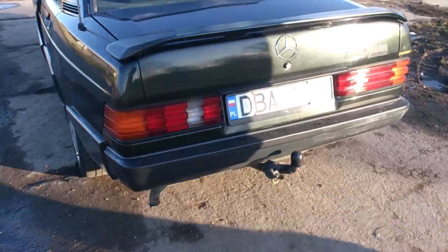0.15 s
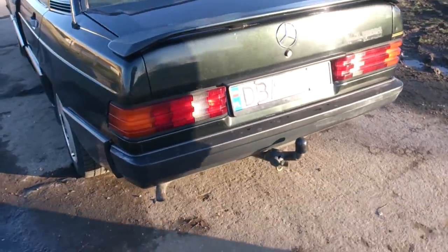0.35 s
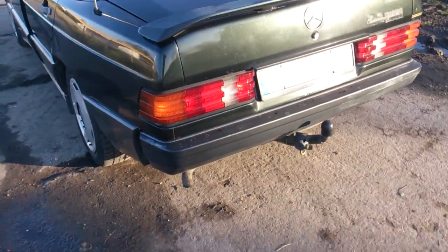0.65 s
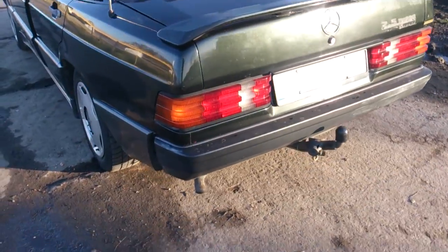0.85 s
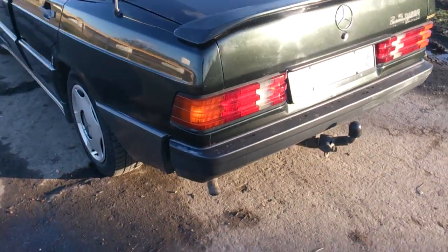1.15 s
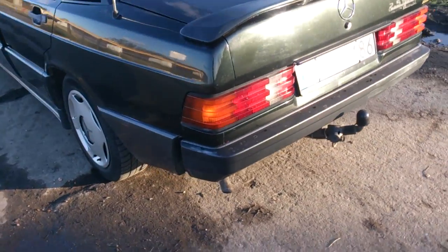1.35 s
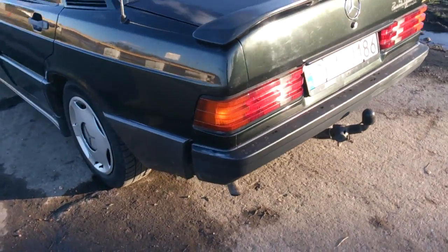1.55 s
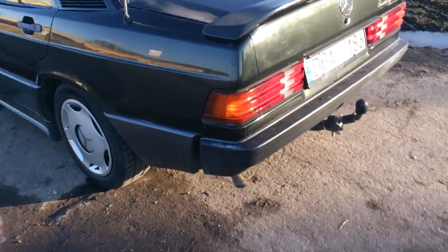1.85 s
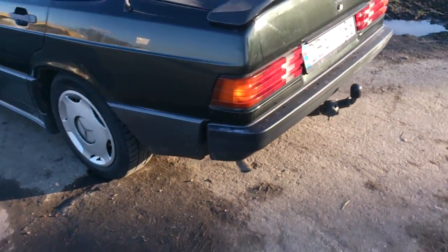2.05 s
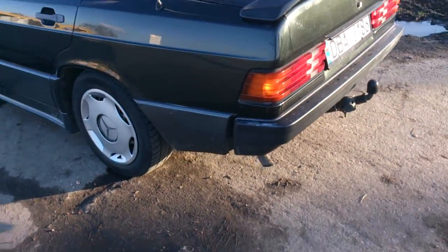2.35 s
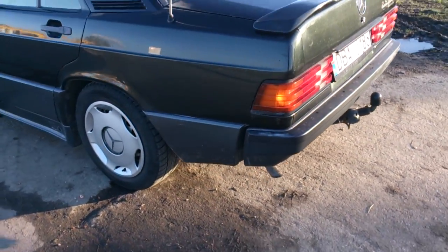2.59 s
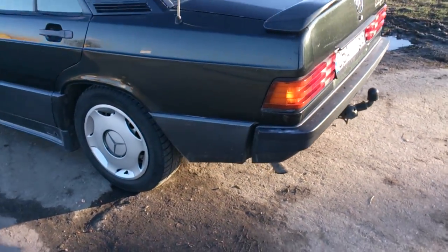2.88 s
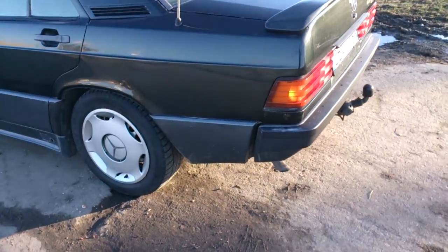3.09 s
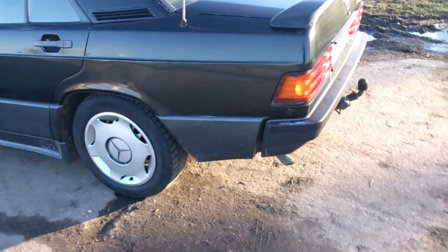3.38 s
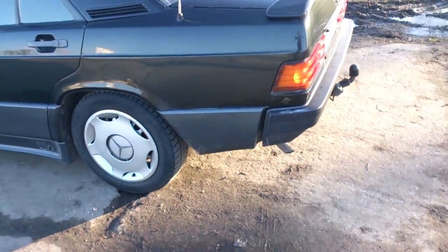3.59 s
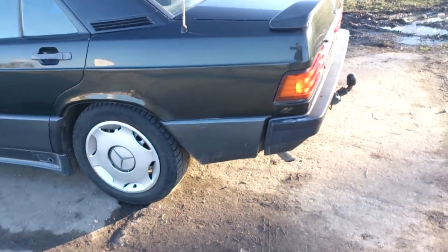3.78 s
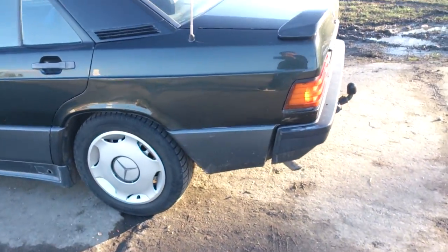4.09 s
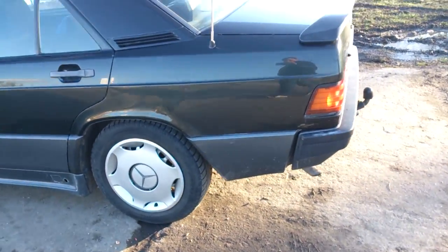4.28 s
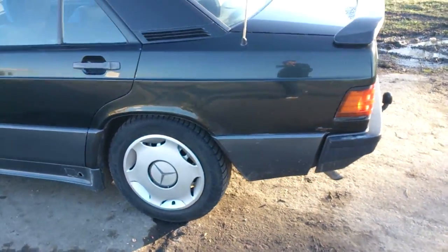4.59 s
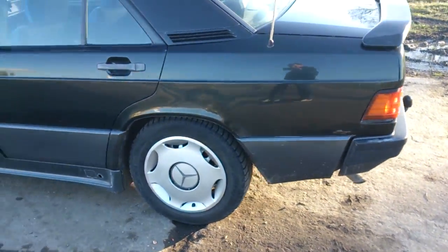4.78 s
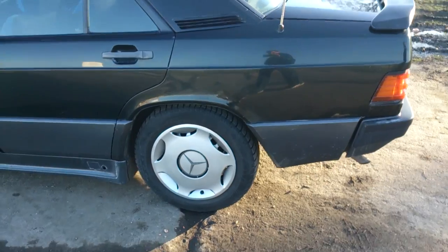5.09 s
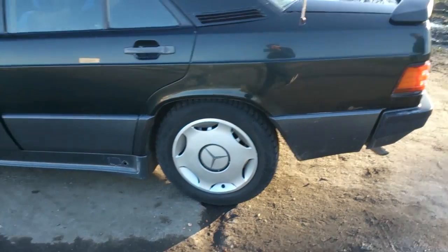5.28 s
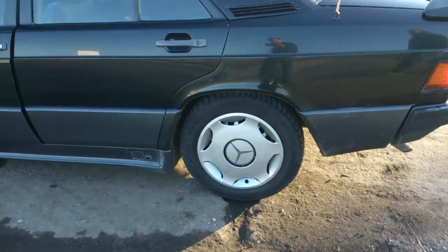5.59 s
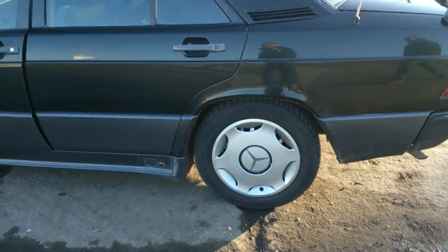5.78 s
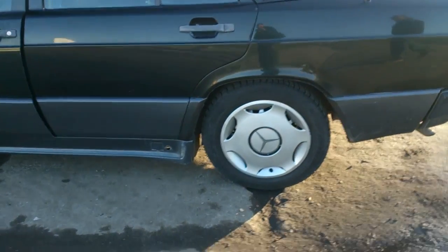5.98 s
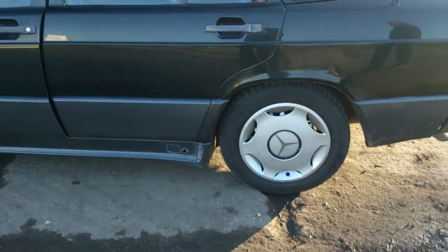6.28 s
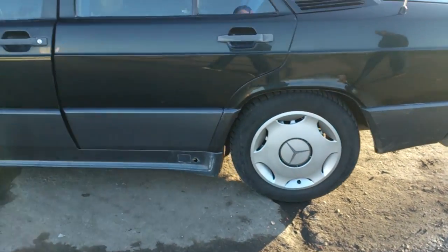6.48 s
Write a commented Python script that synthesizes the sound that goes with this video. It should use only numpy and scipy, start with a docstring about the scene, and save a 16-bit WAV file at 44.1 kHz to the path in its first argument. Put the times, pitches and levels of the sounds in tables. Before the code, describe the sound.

Low exhaust throb and rattly diesel knocking get louder as the listener walks alongside the car, with wind thumping unevenly across both channels.

```python
"""Outdoors, two microphone ports are carried from the tail of an idling four-cylinder diesel car to its engine.
Throughout, the exhaust throbs in low multiples of the firing rate, every firing rings the block's modes, and
chain and belt-driven parts hum as wandering sines. Early on a shoe on grit gives a faint click, then one swish
of noise. Gusts of shaped noise with short eddies buffet each port apart, heaviest at about 4.6 s.
By the end, 6.65 s, the knocks and hums of the near engine have grown loudest."""
import sys
import numpy as np
from scipy import signal
from scipy.fft import rfft, irfft, next_fast_len
from scipy.io import wavfile
from scipy.ndimage import uniform_filter1d, map_coordinates

SR = 44100
rng = np.random.default_rng(int(sys.argv[2]) if len(sys.argv) > 2 else 0)


def put_to_file(sound):
    """Save the sound as 16-bit audio at rate SR, in the file named by the first command-line argument."""
    columns = np.atleast_2d(sound).T  # one column per channel
    safe = np.clip(columns, -1, 1)
    whole_steps = np.round(safe * 32767)
    wavfile.write(sys.argv[1], SR, whole_steps.astype(np.int16))


N = 293265
t = np.arange(N) / SR
IDLE_HZ = 28.687  # firings a second


def amp(db):
    """Amplitude of a level in dB."""
    return 10 ** (np.asarray(db) / 20)


def unit(x):
    """x scaled to rms 1."""
    return x / np.sqrt(np.mean(x ** 2, axis=-1, keepdims=True) + 1e-20)


def along(points, hz):
    """Values of (f/Hz, value) points, joined on a log frequency axis."""
    f, v = np.transpose(points)
    return np.interp(np.log(hz + 1), np.log(f + 1), v)


def curves(rows):
    """One value per sample for each column after the time."""
    s, *columns = np.transpose(rows)
    return np.array([np.interp(t, s, column) for column in columns])


def wobble(rate):
    """A smooth random curve, rate knots a second."""
    knots = rng.standard_normal(int(N * rate / SR) + 4)
    return map_coordinates(knots, [t * rate])


def filtered(x, response):
    """x times a complex response of frequency."""
    m = next_fast_len(N + 8192)
    return irfft(rfft(x, m) * response(np.fft.rfftfreq(m, 1 / SR)), m)[..., :N]


def noise(spectrum):
    """Two unrelated noises of rms 1, shaped by a spectrum."""
    white = rng.standard_normal((2, N))
    return unit(filtered(white, lambda hz: amp(along(spectrum, hz))))


def ports(pair, alike):
    """The left port hears a share of the right one's sound, earlier, turned in phase and with its own colour."""
    # colour between the ports: (f/Hz, level left minus right/dB)
    port_colour = [(60, -12), (200, -2), (400, -5), (700, -7.5), (1300, -7), (2400, -7), (4400, 1.5),
                   (5700, 4.5), (8000, 3), (11000, -3.5), (13500, -10.5), (15500, -6)]
    left = alike * pair[1] + np.sqrt(1 - alike ** 2) * pair[0]
    lead_s, turn_rad = 0.0003556, 2.39

    def lead(hz):
        return amp(along(port_colour, hz)) * np.exp(1j * (turn_rad + 2 * np.pi * hz * lead_s))
    return np.array([filtered(left, lead), pair[1]])


def exhaust(lag_ms):
    """Low multiples of the firing rate, arriving nearly opposite in phase at the two ports."""
    # exhaust throb: (multiple of the firing rate, left peak level/dB, right peak level/dB, phase/rad), before sway
    throb = [(1, -22, -27, 0.5), (2, -31, -32, -4.5), (3, -56, -64, 1.5), (4, -58, -60, -6),
             (5, -64.5, -53, -4), (6, -51.5, -53.5, 2.5), (7, -79, -68, 0), (8, -64, -56, 0)]
    turn = 2 * np.pi * IDLE_HZ * (t - lag_ms / 1000)
    sway = amp(0.85 * wobble(8.7))
    port_phase = np.array([[0], [2.7]])  # rad, left and right
    pulses = 0
    for k, left, right, phase in throb:
        pulses = pulses + amp([[left], [right]]) * np.cos(k * turn + phase - port_phase)
    return sway * pulses


def block(near_db):
    """Each firing is a blow and a burst of combustion noise that ring the block's modes, at new strengths every time."""
    # modes of the engine block, low to high: (f/Hz, width/Hz, level within its group/dB)
    boom_modes = [(693, 73, -6), (825, 110, -3.5), (1015, 79, 3)]
    ring_modes = [(1330, 94, 4), (1487, 67, 6), (1612, 48, 6), (1701, 51, 5), (1789, 62, 5),
                  (2017, 46, -2.5)]
    clack_modes = [(2400, 340, 9), (2908, 260, 8), (3980, 210, 3), (4316, 80, 2), (4600, 34, -3.5),
                   (4860, 22, -9), (5770, 330, -2.5)]
    tick_modes = [(8560, 450, -7.5), (9460, 490, -5), (10320, 570, 1), (10960, 560, 0.5),
                  (11700, 170, -2.5), (12700, 800, -0.5), (13500, 500, -4.5), (15200, 880, -7)]
    # each mode group before the walk's gain: (knock level/dB, level of rattle between knocks/dB,
    # share of the walk's gain, burst t60/s, share of clean blow 0-1, likeness of ports 0-1)
    groups = [(-52, -73, 0.67, 0.13, 0.6, 0.92), (-48.5, -68.5, 0.85, 0.087, 0.47, 0.46),
              (-58, -66.5, 0.48, 0.12, 0.02, 0.08), (-58.5, -72, 1, 0.11, 0, 0)]
    # each cylinder's own offset to the knock: (boom level/dB, ring level/dB, clack level/dB, tick level/dB)
    cylinders = [(5, -2.5, 3.5, -4), (-5, -1, -0.5, -2.5), (6.5, 1.5, -5, -0.6), (-9, -0.1, -4, -1.5)]
    # the hardest knocks, before mode scatter: (t/s, ring level/dB, clack level/dB)
    hard_knocks = [(0.072, -44, -56.5), (0.664, -43, -68), (0.908, -42.5, -80), (1.117, -48, -51),
                   (1.257, -46.5, -50), (1.536, -56, -51.5), (1.606, -40, -82), (1.884, -41, -59),
                   (2.163, -41, -51), (2.303, -38.5, -72), (2.826, -43, -55), (2.93, -47, -47.5),
                   (3.0, -37, -67), (3.139, -38, -48), (3.314, -37.5, -68), (3.523, -39.5, -46.5),
                   (3.592, -39.5, -66), (3.732, -38, -58), (3.767, -43, -48.5), (3.976, -37.5, -71),
                   (4.22, -35, -47), (4.255, -36, -59), (4.673, -38, -59), (4.987, -37, -66),
                   (5.022, -48, -42.5), (5.231, -33, -56), (5.266, -38.5, -52.5), (5.335, -34, -47.5),
                   (5.405, -37.5, -55), (5.579, -53, -42), (5.893, -37, -41), (5.928, -36.5, -62),
                   (6.067, -35, -55), (6.172, -33.5, -44.5), (6.207, -31, -72), (6.277, -37.5, -43),
                   (6.346, -32.5, -53.5), (6.486, -29.5, -66), (6.555, -34, -48)]
    # scatter from knock to knock: one level/dB for each group
    knock_scatter_db = [0.82, 2.14, 2.64, 1]
    # scatter from mode to mode within a knock: one level/dB for each group
    mode_scatter_db = [1.2, 3, 3, 1.5]
    first_s, jitter_s, latest_s = 0.002587, 0.00029, 0.003044  # first firing, its scatter, latest blow
    knock_db, rattle_db, share, t60, clean, alike = np.transpose(groups)

    times = np.arange(first_s, N / SR, 1 / IDLE_HZ)
    jittered = times + jitter_s * rng.standard_normal(len(times))
    at = np.clip((jittered * SR).astype(int), 0, N - 1)
    own = np.array(cylinders)[np.arange(len(times)) % len(cylinders)]
    level = knock_db + own + share * near_db[at, None]
    level = level + knock_scatter_db * rng.standard_normal(own.shape)
    hard = np.array(hard_knocks)
    hard_firing = np.round((hard[:, 0] - first_s) * IDLE_HZ).astype(int)
    level[hard_firing, 1:3] = hard[:, 1:]
    # a hard clack ticks louder too
    level[:, 3] += 0.17 * (level[:, 2] - knock_db[2] - share[2] * near_db[at])

    out, u = 0, t[:SR // 8]
    for g, modes in enumerate((boom_modes, ring_modes, clack_modes, tick_modes)):
        shape = 2 * (1 - np.exp(-u / 0.0014)) * amp(-60 * u / t60[g])
        total = np.sqrt(sum(amp(2 * db) for _, _, db in modes))
        rattle = amp(rattle_db[g] + share[g] * near_db)
        rung = 0
        for hz, width_hz, db in modes:
            size = amp(level[:, g] + mode_scatter_db[g] * rng.standard_normal(len(at)))
            burst = signal.oaconvolve(np.bincount(at, size, N), shape)[:N]
            rasp_level = np.hypot(np.sqrt(1 - clean[g]) * burst, rattle)
            rasp = rasp_level * rng.standard_normal((2, N))
            # the blow reaches each part a little later
            late = at + (latest_s * SR * rng.random((2, len(at)))).astype(int)
            taps = np.array([np.bincount(a, size, N)[:N] for a in late])
            blows = 3.2 * np.sqrt(clean[g]) * taps
            rung = rung + amp(db) / total * ring(blows, rasp, hz, width_hz)
        out = out + ports(rung, alike[g])
    return out


def ring(blows, rasp, hz, width_hz):
    """One mode, a two-pole resonance: softened blows strike it, white noise through it keeps its level."""
    def poles(radius):
        return [1, -2 * radius * np.cos(2 * np.pi * hz / SR), radius * radius]

    r = np.exp(-np.pi * width_hz / SR)
    swell = np.exp(-np.pi * (width_hz + 110) / SR)
    # pressure builds over a few cycles
    soft = signal.lfilter([1, 0, -1], poles(swell), blows) * (1 - swell ** 2) / 2
    drive = soft / np.sqrt(2) + rasp * np.sqrt((1 - r * r) / 2)
    return signal.lfilter([1, 0, -1], poles(r), drive)


def hums(near_db):
    """Chain links and belt-driven parts sing at slightly wandering rates."""
    # timing chain hum and whines of belt-driven parts: one centre f/Hz for each
    hum_hz = [272.3, 544.5, 1046, 1821, 2053]
    # how far each pitch strays: one scale f/Hz for each
    wander_hz = [2, 7, 4, 4, 5]
    # each hum before the walk's gain and flutter: (rms level/dB, share of the walk's gain)
    hum_levels = [(-55, 0.41), (-51, 0.36), (-64.5, 1.18), (-75.5, 1.4), (-74, 1.6)]
    hum = 0
    for hz, wander, (db, share) in zip(hum_hz, wander_hz, hum_levels):
        level = amp(db + share * near_db + 3.05 * wobble(25))
        turn = 2 * np.pi * np.cumsum(hz + wander * wobble(30)) / SR
        hum = hum + level * np.sqrt(2) * np.sin(turn)
    return ports(np.array([hum, hum]), alike=1)


def body(near_db):
    """Panels and ground give back a drone: shaped noise, swaying slightly, that grows on the walk."""
    # car body drone, shape only: (f/Hz, relative level/dB per Hz)
    drone = [(40, -7), (100, -8), (200, -10), (320, -14), (500, -12.5), (800, -11.5), (2000, -16.5),
             (6000, -42.5), (15000, -70)]
    level_db = -47 + .5 * near_db + 0.94 * wobble(9)
    return ports(amp(level_db) * noise(drone), alike=0.5)


def wind_level():
    """Level at each port in dB: the slowly rising and falling wind plus bell-shaped gusts."""
    # slowly rising and falling wind on the ports: (t/s, left level/dB, right level/dB)
    slow_wind = [(0, -74, -56), (0.9, -57, -55), (1.4, -60, -55), (1.9, -48.5, -44), (2.6, -50, -42),
                 (3.3, -48, -41), (3.7, -43, -27.5), (4.2, -34.5, -24.5), (4.7, -29.5, -23),
                 (5.2, -43, -21), (5.55, -34, -27), (5.8, -48, -35.5), (6.1, -56, -30.5), (6.4, -32.5, -24),
                 (6.65, -26.5, -18)]
    # gusts over it: (t/s, half length/s, left level/dB, right level/dB)
    gust_rows = [(0.377, 0.048, -52, -36), (0.512, 0.053, -34, -20), (0.797, 0.054, -38.5, -26),
                 (1.0, .04, -46, -53), (1.566, .05, -48, -37.5), (1.784, .05, -36.5, -37),
                 (1.996, .05, -42, -28.5), (2.096, .04, -41, -27.5), (2.207, 0.052, -40, -20),
                 (2.443, 0.041, -33, -24), (2.587, .035, -37, -23), (2.694, 0.052, -29.5, -49),
                 (2.8, 0.048, -31.5, -27), (2.915, .05, -47, -30), (3.126, 0.058, -44, -30),
                 (3.424, 0.048, -41, -26.5), (3.63, .06, -40, -21.5), (3.772, 0.057, -52, -27.5),
                 (3.934, 0.03, -31, -17), (4.105, 0.097, -31.5, -19), (4.388, 0.041, -38, -18.5),
                 (4.568, 0.06, -29, -9.5), (4.768, 0.078, -34, -10), (4.894, 0.026, -28, -30),
                 (5.112, 0.051, -26, -15.5), (5.245, .04, -28, -30), (5.468, 0.033, -27.5, -22.5),
                 (5.922, 0.074, -46, -29), (6.187, 0.042, -48, -22), (6.29, 0.051, -29, -28),
                 (6.366, .04, -37, -18.5), (6.438, 0.029, -24, -28), (6.625, 0.048, -26, -20.5)]
    gusts = 0
    for s, half, left, right in gust_rows:
        gusts = gusts + amp([[left], [right]]) * np.exp(-((t - s) / half) ** 2)
    return 20 * np.log10(np.hypot(amp(curves(slow_wind)), gusts))


def wind(wind_db):
    """Eddies push each port in lumps; stronger wind blows brighter, and a deep pressure follows it slowly."""
    # weak wind, strong wind and deep pressure, shape only: (f/Hz, relative level/dB per Hz)
    breeze = [(30, -11), (60, -1.5), (110, 5.5), (160, 0.5), (240, -10.5), (350, -26), (500, -55),
              (800, -41), (1500, -86)]
    blast = [(40, -3.5), (100, 1.5), (180, 2.5), (300, -1), (450, -10.5), (650, -19), (900, -35),
             (1300, -40), (2200, -90)]
    deep = [(5, -3), (20, 1.5), (45, -2), (70, -4), (110, -15), (200, -37), (400, -85)]
    # deep pressure when the smoothed wind is at -30 dB, before its sway: left and right level/dB
    heave_at_30_db = [
        [-25.5],
        [-28.5],
    ]
    # share of blast in the strongest wind, wind level at half of it, spread
    hardest, half_hard_db, hardens_db = 0.6, -23, 3.5
    heave_follows, heave_s, sway_db = 0.53, 0.15, 3  # dB per dB of wind, smoothing, own sway

    hard = hardest / (1 + np.exp((half_hard_db - wind_db) / hardens_db))
    lumps = amp([1.73 * wobble(35) + 3.6 * wobble(90) for _ in wind_db])
    buffet = np.sqrt(1 - hard) * noise(breeze) + np.sqrt(hard) * noise(blast)
    slow_db = 20 * np.log10(abs(uniform_filter1d(amp(wind_db), int(heave_s * SR))))
    sway = sway_db * np.array([wobble(5), wobble(5)])
    heave_db = heave_at_30_db + heave_follows * (slow_db + 30) + sway
    return amp(wind_db) * unit(lumps) * buffet + amp(heave_db) * noise(deep)


def thumps(wind_db):
    """A hard eddy pushes one port for a cycle or two; the lesser ones grow with the wind."""
    # the hardest single eddies: (t/s, envelope peak level/dB, f/Hz, port: 0 left 1 right)
    hard_eddies = [(0.524, -18, 246, 1), (0.544, -18, 290, 1), (0.769, -18, 172, 1), (2.088, -15, 170, 1),
                   (2.19, -2.5, 182, 1), (2.58, -14.5, 236, 1), (3.632, -11.5, 222, 1),
                   (3.811, -13, 235, 1), (3.933, -5.5, 191, 1), (4.067, -8.5, 266, 1),
                   (4.147, -10.5, 209, 1), (4.391, -9.5, 231, 1), (4.401, -11, 422, 1),
                   (4.518, -11, 382, 1), (4.565, -10.5, 212, 1), (4.581, 0, 440, 1), (4.605, -15, 239, 0),
                   (4.608, 2.5, 326, 1), (4.635, -5.5, 277, 1), (4.673, -5, 307, 1), (4.747, -12, 288, 1),
                   (4.767, -12, 162, 0), (4.771, -6.5, 202, 1), (4.815, -4.5, 310, 1), (4.836, -7, 212, 1),
                   (5.091, -11, 201, 0), (5.096, -14, 186, 1), (5.17, -9, 290, 1), (5.253, -11, 250, 1),
                   (5.495, -12.5, 221, 1), (6.04, -12.5, 163, 1), (6.181, -7, 183, 1),
                   (6.258, -7.5, 145, 1), (6.283, -22, 196, 0), (6.369, -3, 211, 1), (6.448, -10, 257, 1),
                   (6.455, -14.5, 187, 0), (6.505, -9, 275, 1), (6.525, -7.5, 221, 1),
                   (6.597, -5.5, 184, 1)]
    eddies = 160  # lesser ones, at random moments on either port
    over_db, scatter_db = 5, 3.5  # envelope peak over the wind, its scatter
    eddy_hz, log_spread = 195, 0.17
    half = SR // 40  # samples either side of a peak
    when, side = rng.random((eddies, 2)).T
    size, pitch = rng.standard_normal((eddies, 2)).T
    side = side.round().astype(int)
    local_wind_db = wind_db[side, (when * (N - 1)).astype(int)]
    peak_db = local_wind_db + over_db + scatter_db * size
    lesser = zip(when * N / SR, peak_db, eddy_hz * np.exp(log_spread * pitch), side)

    out, u = np.zeros((2, N + 2 * half)), np.arange(-half, half) / SR
    for s, db, hz, port in [*lesser, *hard_eddies]:
        envelope = np.exp(-(u * hz / 0.43) ** 2)
        push = np.cos(2 * np.pi * (hz * u + rng.random())) * envelope
        out[round(port), round(s * SR):][:len(u)] += amp(db) * push
    return out[:, half:][:, :N]


def scuffs():
    """A shoe on grit: a faint click, then one grainy swish, both noise under bell-shaped strokes."""
    # strokes, before the grain: (t/s, level/dB, half length/s)
    strokes = [(0.54, -62, .003), (0.65, -47, 0.03)]
    # colour of the grit, shape only: (f/Hz, relative level/dB per Hz)
    grit = [(1500, 2), (3000, 1), (5000, -1), (8000, -13), (12000, -6), (15500, -6)]
    stroke = sum(amp(db) * np.exp(-((t - s) / half) ** 2) for s, db, half in strokes)
    grain = amp(2.1 * wobble(300))
    return stroke * grain * noise(grit)


def hiss():
    """Far air and microphone hiss: constant shaped noise, nearly unrelated at the two ports."""
    # colour of the hiss, shape only: (f/Hz, relative level/dB per Hz)
    hiss_colour = [(2000, -3), (5000, -13), (7000, -18.5), (9500, -7.5), (12000, -3), (15500, -6.5)]
    return ports(amp(-57) * noise(hiss_colour), alike=.1)


def scene():
    """The walk sets the distance of the engine; wind and hiss lie over it."""
    # walk toward the engine: (t/s, gain of the engine noise as level/dB, lag of the exhaust/ms)
    walk = [(0, -3, -0.5), (1, -2.5, 2.5), (2, -1, 4.5), (3, 3.5, 8), (4, 4.5, 4.5), (4.6, 5.5, 15.5),
            (5.3, 6.5, 3.5), (5.9, 8.5, 6.5), (6.65, 12, 9)]
    near_db, lag_ms = curves(walk)
    wind_db = wind_level()
    engine = exhaust(lag_ms) + block(near_db) + hums(near_db) + body(near_db)
    return engine + wind(wind_db) + thumps(wind_db) + scuffs() + hiss()


def record(dry):
    """The housing dulls one band, the loudest gusts saturate the input, nothing is kept above the band limit."""
    # microphone housing: (f/Hz, level/dB)
    valley = [(5200, 0), (7000, -6), (8800, -2)]
    loud = filtered(dry, lambda hz: amp(along(valley, hz)))
    soft = loud / (1 + abs(loud / .97) ** 6) ** (1 / 6)
    return filtered(soft, lambda hz: hz < 15700)


dry = scene()
out = record(dry)
put_to_file(out)
```